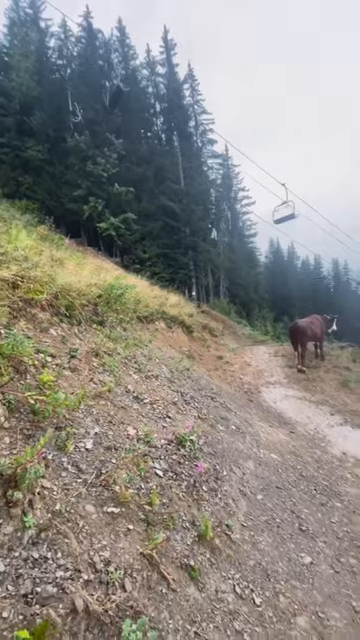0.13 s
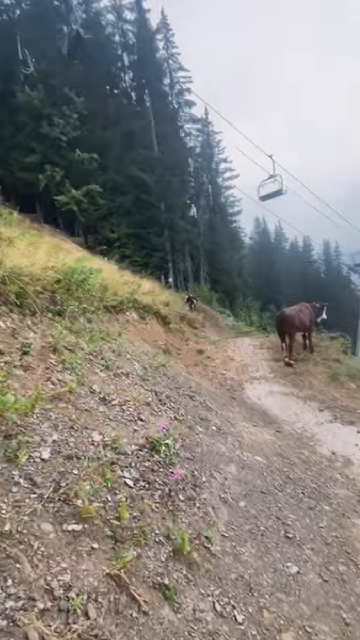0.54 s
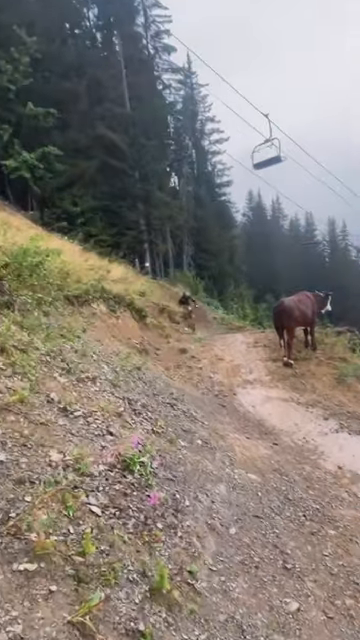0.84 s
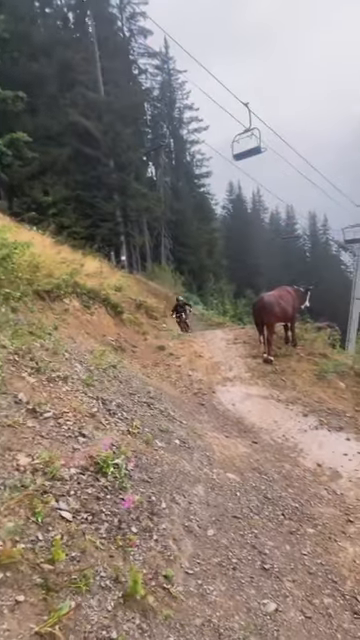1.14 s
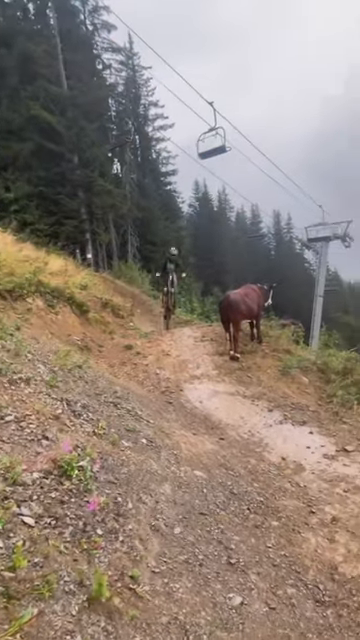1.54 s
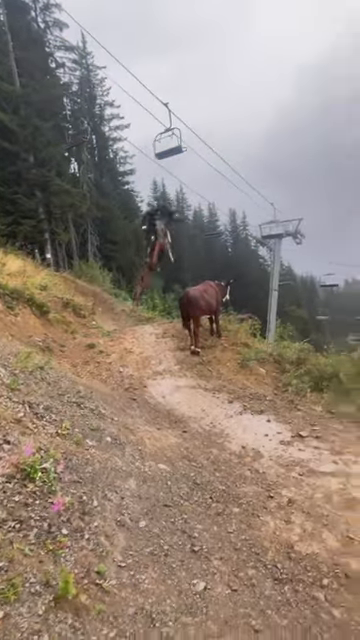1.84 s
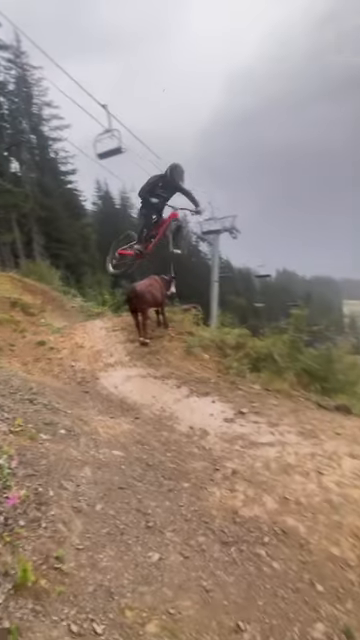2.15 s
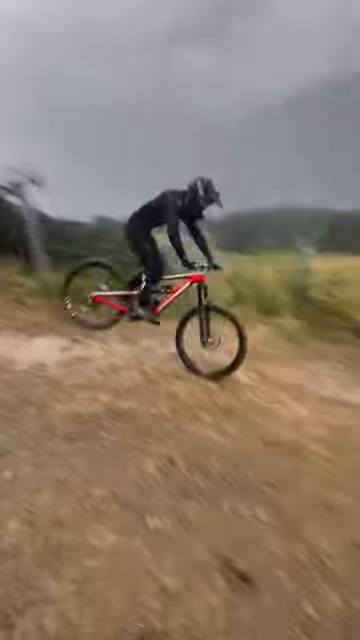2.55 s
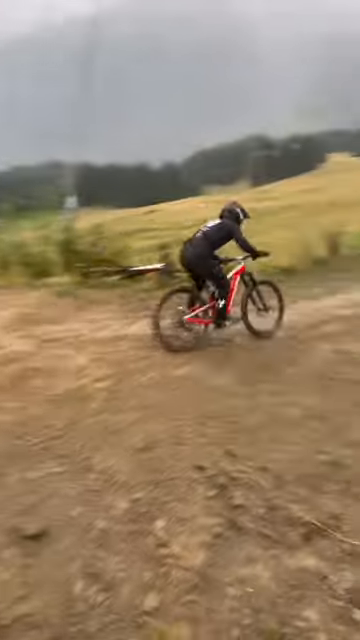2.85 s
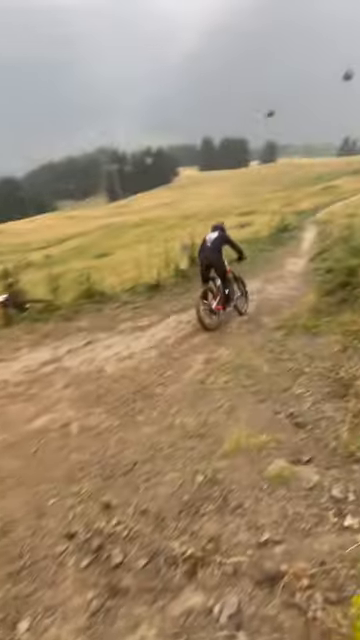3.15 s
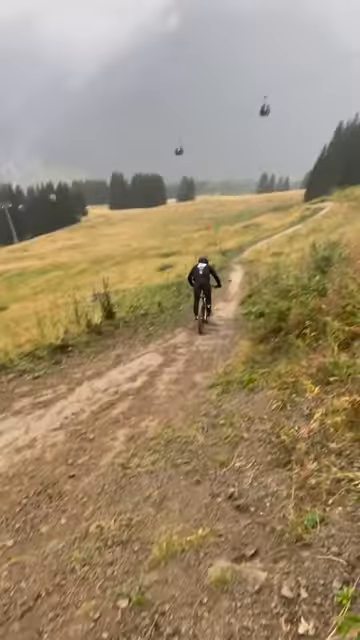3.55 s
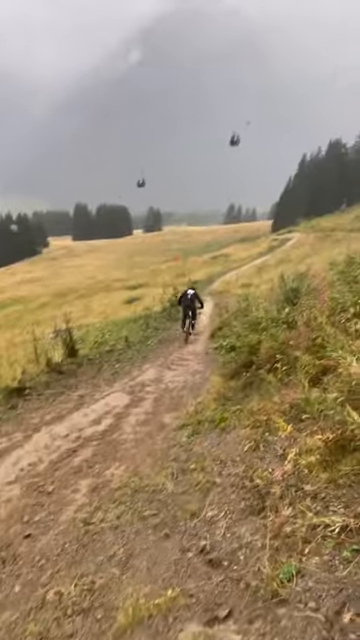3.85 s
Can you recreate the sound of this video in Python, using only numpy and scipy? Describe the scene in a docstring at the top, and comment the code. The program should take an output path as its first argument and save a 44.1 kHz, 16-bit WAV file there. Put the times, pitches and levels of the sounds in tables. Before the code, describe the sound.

On an outdoor dirt trail, a mountain bike approaches quietly, jumps and lands nearby with a loud crack and thump. Its tyres crunch off over gravel, the freewheel buzzing and the bike rattling, as gusts hit the microphone.

```python
"""A dirt trail by a chairlift: a mountain bike rolls down, jumps, lands hard and leaves over stones.
Its tyres rumble and hiss, its pawls ring the hub, and impacts excite the resonances of its frame.
The lift hums, a cow's bell tinkles faintly, and wind buffets a phone's two microphone ports.
Two-row signals hold what the ports share, then what differs between them."""
import sys
import numpy as np
from scipy import signal
from scipy.fft import rfft, irfft, next_fast_len
from scipy.io import wavfile
from scipy.ndimage import uniform_filter1d, map_coordinates

SR = 44100
rng = np.random.default_rng(int(sys.argv[2]) if len(sys.argv) > 2 else 0)


def dump(signal):
    """Clip the signal to [-1, 1] and save it as 16-bit WAV at the path in sys.argv[1]."""
    limited = np.clip(np.atleast_2d(signal).T, -1, 1)
    pcm = np.round(limited * 32767).astype(np.int16)
    wavfile.write(sys.argv[1], SR, pcm)


N = 176400
PASS_S = 2.5  # the bike passes and the phone swings after it

# Spectrum of cracks and crunches. Each row: frequency in Hz, gain in dB.
CRACK_SPECTRUM = [(300, 10), (1500, -3), (3000, -2), (5000, 0), (7500, -11.5), (10300, -16)]


def amp(db):
    return 10 ** (np.asarray(db) / 20)


def unit(x):
    return x / np.sqrt(np.mean(x ** 2) + 1e-20)


def along(points, hz):
    """Interpolate (Hz, value) points on a log frequency axis."""
    f, v = np.transpose(points)
    return np.interp(np.log(hz + 1), np.log(f + 1), v)


def curves(rows):
    """One value per sample for each column after the time."""
    times, *columns = np.transpose(rows)
    return [np.interp(np.arange(N) / SR, times, c) for c in columns]


def wobble(rate):
    """A smooth random curve with rate knots a second."""
    return map_coordinates(rng.standard_normal(int(N * rate / SR) + 4), [np.arange(N) * rate / SR])


def filtered(x, response):
    """Multiply the spectrum of x by a frequency response."""
    size = next_fast_len(N + SR // 2)
    return irfft(rfft(x, size) * response(np.fft.rfftfreq(size, 1 / SR)), size)[..., :N]


def colour(points):
    return lambda hz: amp(along(points, hz))


def resonances(modes):
    """Superposed damped modes of alternating sign."""
    return lambda f: sum((-1) ** k * amp(db) * 1j * f * width / (hz * hz - f * f + 1j * f * width)
                         for k, (hz, width, db) in enumerate(modes))


def patchy(depth_db):
    """Two independent noises sharing patches of random gain in time and frequency."""
    spectra = signal.stft(rng.standard_normal((2, N)), nperseg=512)[2]
    patches = uniform_filter1d(uniform_filter1d(rng.standard_normal(spectra.shape[1:]), 5, 0), 8, 1)
    return signal.istft(spectra * amp(depth_db * unit(patches)), nperseg=512)[1][:, :N]


def damped_sine(t, hz, db, t60, rise_s):
    """Free vibration of one mode, with a soft onset."""
    return amp(db - 60 * t / t60) * np.sin(2 * np.pi * hz * t) * (1 - np.exp(-t / rise_s))


def add(out, start, x):
    i = round(start * SR)
    out[..., i:i + x.shape[-1]] += x[..., :N - i]


def landing():
    """Impact excitation: each blow cracks, rings the frame and thumps the tyre; bumps rattle the frame."""
    # Each row: start in seconds, crack, knock and thump levels in dB, decay scale in seconds.
    blows = [(2.421, -15.5, -29, -22, 0.046), (2.4815, -37.5, -29.5, -41.5, 0.02),
             (2.512, -6, -13.5, -14, 0.082), (2.5682, -5, -28, -21.5, 0.041),
             (2.6595, -33.5, -55, -35, 0.033), (2.6833, -47, -32.5, -33, 0.091)]
    # Each row: start in seconds, level in dB.
    rattles = [(2.813, -28.5), (2.88, -42.5), (2.937, -29.5), (2.982, -37), (3.009, -31.5), (3.073, -31.5),
               (3.084, -26), (3.115, -30), (3.225, -34.5), (3.261, -29.5), (3.43, -37), (3.623, -32.5),
               (3.652, -40.5), (3.672, -34.5), (3.726, -31.5), (3.768, -28.5), (3.812, -35.5),
               (3.844, -31.5), (3.949, -32)]
    # Each row: frequency in Hz, bandwidth in Hz, gain in dB.
    frame_modes = [(340.8, 47.5, 3.5), (521.4, 66.5, 5.5), (660.4, 121, 7), (1095.7, 130.5, 1.5),
                   (1453, 133, -1), (1672, 145, 1.5), (1968, 172, -0.5), (2508, 124, 0), (3142, 76, -10.5)]
    crack, knock, thump = np.zeros((2, N)), np.zeros((2, N)), np.zeros(N)
    t = np.arange(SR // 3) / SR
    for start, crack_db, knock_db, thump_db, decay in blows:
        noise = rng.standard_normal((4, len(t))) * (1 - np.exp(-t / 0.00022))
        crack_fade = amp(-60 * t / (decay * 1.71)) + 0.49 * amp(-60 * t / 0.016)
        knock_fade = amp(-60 * np.maximum(t - .007, 0) / (decay * 0.52))
        add(crack, start, noise[:2] * amp(crack_db - 13) * crack_fade)
        add(knock, start, noise[2:] * amp(knock_db + 10.5) * knock_fade)
        add(thump, start, damped_sine(t, hz=61.75, db=thump_db + 2, t60=0.19, rise_s=0.0063))
    for start, db in rattles:
        add(knock, start, rng.standard_normal((2, len(t))) * amp(db + 6 - 60 * t / 0.0335))
    broad_mode = resonances([(1500, 2200, 0)])
    frame = filtered(knock, lambda f: resonances(frame_modes)(f) + 0.136 * broad_mode(f))
    return filtered(crack, colour(CRACK_SPECTRUM)) + frame * [[1], [.45]] + thump * [[1], [.3]]


def tyres():
    """Rolling noise: bumps modulate the rumble of knobbly tyres, the tread's roar and the grit's hiss."""
    # Each row: time in seconds, rumble, grit and roar levels in dB.
    approach = [(0.04, -63, -58, -52), (0.142, -67, -59.5, -58.5), (0.28, -61, -61.5, -59.5),
                (0.522, -58.5, -63, -62.5), (0.786, -52.5, -62, -59.5), (0.996, -49.5, -57.5, -56),
                (1.178, -49, -57, -50), (1.296, -44, -56, -49), (1.384, -48.5, -55.5, -53.5),
                (1.46, -49, -56, -53.5)]
    flight = [(1.5, -54, -56, -67), (1.72, -62, -56, -56.5), (1.77, -60, -55.5, -54),
              (1.82, -61.5, -55, -61.5), (1.946, -61, -60, -58), (2.232, -56.5, -59.5, -58.5),
              (2.41, -57, -61.5, -50.5)]
    away = [(2.43, -35.5, -53, -45), (2.478, -38.5, -48, -43), (2.542, -34, -47, -34.5),
            (2.596, -27.5, -36, -33.5), (2.656, -33.5, -41.5, -43), (2.788, -42, -42, -47.5),
            (3.002, -43.5, -48, -47.5), (3.182, -40.5, -47, -51.5), (3.392, -46, -48, -52.5),
            (3.672, -42.5, -53, -52), (3.828, -45.5, -53, -55.5), (3.93, -53, -57, -52),
            (4.0, -49, -69.5, -58)]
    # Spectra. Each row: frequency in Hz, gain in dB.
    rumble_coming = [(65, -18.5), (110, -6), (134, -10), (204, 0), (242, -6.5), (296, -4), (347, -14),
                     (384, -10), (483, -5), (781, -15), (1200, -25), (1560, -57), (2640, -120)]
    rumble_going = [(76, -41.5), (130, -1.5), (172, -7.5), (209, 4), (242, -8), (281, -7.5), (368, -16),
                    (609, -3.5), (662, -5.5), (891, -12.5), (1200, -17), (1560, -59), (2640, -120)]
    tread_spectrum = [(500, -25.5), (900, -3.5), (1500, 0), (2400, -5), (2800, -31)]
    grit_spectrum = [(500, 0.5), (1000, -4), (2400, 1.5), (2800, 2), (3700, 2.5), (4350, -0.5), (5000, 1),
                     (6000, -1), (7000, 0), (9400, -5)]
    rumble_db, grit_db, roar_db = curves([*approach, *flight, *away])
    passed = np.arange(N) / SR > PASS_S
    bumps_db = 0.95 * wobble(24.908)
    coming = unit(filtered(patchy(1.95), colour(rumble_coming))) * amp([[0], [-1]])
    going = unit(filtered(patchy(1.95), colour(rumble_going))) * amp([[0], [-8]])
    rumble = np.where(passed, going, coming) * amp(rumble_db + 2 + bumps_db)
    roar = unit(filtered(patchy(4.01), colour(tread_spectrum))) * amp(roar_db + 0.311 * bumps_db)
    roar[1] *= amp(-19 * passed)  # more central once the phone has swung
    grains = amp(3.48 * rng.standard_normal(N) + 0.62 * wobble(120))
    grit = unit(filtered(patchy(2.28) * grains, colour(grit_spectrum)))
    return rumble + roar + grit * amp(grit_db + 4 + 0.706 * bumps_db)


def freewheel():
    """Forced resonance: pawl clicks, dense as noise, ring the hub; Doppler shift lowers the pitch."""
    # Each row: time in seconds, level in dB.
    whirr_levels = [(.04, -72.5), (1.0, -77.5), (1.46, -58), (1.487, -48.5), (1.515, -63), (1.54, -48),
                    (1.65, -54), (1.74, -47), (1.775, -75.5), (1.81, -59.5), (1.92, -47.5), (1.95, -54.5),
                    (1.98, -75.5), (2.4, -80.5), (2.58, -39.5), (2.75, -42), (3.0, -47.5), (3.2, -53.5),
                    (3.35, -48.5), (3.65, -56), (4.0, -52)]
    # Each row: frequency in Hz, bandwidth in Hz, gain in dB.
    hub_modes = [(1608, 100, -15.5), (1913.5, 103.5, -1.5), (2071.6, 104, -5.5), (2453, 113, -5.5),
                 (3245, 92, -15.5), (3811.4, 54, -12), (5020, 55, -13), (5414, 70, -18.5), (5929, 98, -12),
                 (6483, 70, -17)]
    take_off_s, pass_width_s, bright_db_per_octave = 1.5, 0.4, 3.5
    whirr_db, = curves(whirr_levels)
    t = np.arange(N) / SR
    ring = np.zeros((2, N))
    for hz, width, db in hub_modes:
        mode = unit(filtered(rng.standard_normal((2, N)), lambda f: resonances([(hz, width, 0)])(f) ** 2))
        tilt_db = bright_db_per_octave * np.log2(hz / 2000) * (t > PASS_S)
        ring += mode * amp(db + tilt_db + 3.33 * wobble(18) + 2.01 * wobble(80))
    sag = .04 * (t - take_off_s - .25) * (t > take_off_s) * (t < PASS_S)  # the wheel spins free
    doppler = 0.027 * np.tanh((t - PASS_S) / pass_width_s)
    position = np.cumsum(1 + .02 * wobble(11) - sag - doppler)
    return unit(np.array([map_coordinates(r, [position], mode="mirror") for r in ring])) * amp(whirr_db)


def stones():
    """Contact noise: single stones tick, and loose ones crunch under a wheel."""
    # Each row: start in seconds, level in dB, the low knock's offset and its port difference in dB.
    ticks = [(0.2096, -49.5, -1.5, 1), (0.3466, -46, -14, 17), (0.8232, -53, 4, 6.5),
             (0.9339, -45.5, -7, 4.5), (1.0953, -55, 8.5, -2), (1.1946, -52.5, 0, 5),
             (1.2245, -60.5, 11.5, 0), (1.3599, -51, -4, 13.5), (1.4495, -52, -14.5, 0.5),
             (1.496, -52.5, -1, 13.5), (1.54, -46, -6.5, 12.5), (1.9037, -31, -21, 13.5),
             (2.1216, -46.5, -9.5, 10.5), (2.2294, -52, 2.5, 5), (3.9662, -23, -11.5, -8)]
    # Each row: start in seconds, level in dB, length in seconds.
    crunches = [(2.5349, -18.5, 0.0199), (2.824, -40.5, 0.0092), (2.915, -48, 0.015), (2.979, -29, 0.013),
                (3.0139, -37, 0.037), (3.071, -28, 0.012), (3.1075, -33, 0.012), (3.221, -31, 0.029),
                (3.25, -27, 0.013), (3.317, -31.5, 0.03), (3.3592, -24.5, 0.0142), (3.426, -26.5, 0.0206),
                (3.4675, -30, 0.0215), (3.521, -30.5, 0.0193), (3.5527, -30.5, 0.017),
                (3.618, -24.5, 0.00277), (3.65, -27, 0.0151), (3.673, -34, 0.0114), (3.7111, -29, 0.0344),
                (3.7628, -27, 0.0126), (3.8022, -31.5, 0.0146), (3.856, -26.5, 0.0236),
                (3.9442, -29.5, 0.0165), (3.9628, -27.5, 0.00794)]
    high, low, crunch = np.zeros((3, 2, N))
    t = np.arange(2048) / SR
    for start, db, low_db, side_db in ticks:
        noise = rng.standard_normal((4, len(t))) * amp(db) * amp([[0], [-1.5], [0], [side_db]])
        add(high, start, noise[:2] * amp(5 - 60 * t / 0.0165))
        add(low, start, noise[2:] * amp(low_db + 16.5 - 60 * t / 0.0322))
    for start, db, length in crunches:
        age = t / max(length, .003) * 3
        noise = rng.standard_normal((3, len(t)))
        grains = amp(db - 1.5 + 6.77 * noise[2])
        add(crunch, start - .002, noise[:2] * grains * age * np.exp(-age))
    return (filtered(high, resonances([(4520, 1880, 0.0012)]))
            + filtered(low, lambda f: resonances([(1300, 2200, 0)])(f) ** 2)
            + filtered(crunch, colour(CRACK_SPECTRUM)) * [[1], [.7]])


def snaps():
    """Brief transients have broad spectra: bright snaps, perhaps the chain slapping."""
    # Each row: start in seconds, level in dB.
    bursts = [(0.859, -37.5), (2.4984, -30.5), (2.5691, -10.5), (2.5844, -20), (2.742, -33.5),
              (3.653, -33.5), (3.71, -45)]
    # Each row: frequency in Hz, gain in dB.
    spectrum = [(900, -25), (1900, -0.5), (5000, -8), (10300, -8.5)]
    out, rise_s = np.zeros(N), 0.000698
    age = np.arange(1024) / SR / rise_s
    for start, db in bursts:
        add(out, start, rng.standard_normal(len(age)) * amp(db) * age * np.exp(1 - age))
    return filtered(out, colour(spectrum))


def thuds():
    """Damped low modes sound as soft hollow thuds."""
    # Each row: start in seconds, frequency in Hz, level in dB.
    hits = [(0.041, 230.8, -40.5), (0.135, 192.8, -33.5), (0.21, 220.6, -45.5), (2.441, 231, -39.5),
            (2.528, 225.4, -20.5), (2.53, 99.4, -15), (2.545, 147.5, -23), (3.656, 193, -34),
            (3.919, 97.8, -21.5), (3.951, 104.9, -19), (3.988, 87.2, -11.5)]
    out, t = np.zeros(N), np.arange(SR // 5) / SR
    for start, hz, db in hits:
        add(out, start, damped_sine(t, hz, db, t60=0.216, rise_s=0.00617))
    return out * [[1], [.6]]


def wind():
    """Turbulent pressure buffets the ports; its lowest frequencies press both alike."""
    # Each row: time in seconds, level in dB, port difference in dB.
    gusts = [(0.04, -43, -18), (0.46, -65.5, -1.5), (0.52, -59, -18.5), (0.94, -59, 4.5), (1.09, -54.5, -3),
             (1.85, -61, 0.5), (1.93, -49.5, -5), (2.18, -63, 3.5), (2.23, -42, -4.5), (2.31, -37.5, -8.5),
             (2.34, -48, 1.5), (2.41, -76.5, -9), (2.43, -24.5, -13), (2.5, -45.5, -7.5), (2.53, -35, -7),
             (2.58, -30.5, -7.5), (2.61, -28.5, -12.5), (2.68, -34, 1.5), (2.71, -25, 5.5),
             (2.84, -31.5, -7.5), (2.87, -46, 13.5), (3.0, -43, 15.5), (3.06, -66.5, 36),
             (3.19, -40.5, 8.5), (3.59, -44, 11.5), (3.63, -37.5, 1), (3.68, -28, -3), (3.7, -39.5, 12),
             (3.77, -37, 9), (3.86, -38.5, 14.5), (3.92, -34, 9), (4.0, -22, -3.5)]
    # Each row: frequency in Hz, gain in dB.
    spectrum = [(22, -32), (40, -3), (60, 0.5), (100, -9), (140, -15.5), (300, -28), (600, -58)]
    alike_below_hz = 89
    db, side_db = curves(gusts)
    pressure = filtered(patchy(1.26), lambda f: colour(spectrum)(f)
                        * [np.ones_like(f), 2.45 * f ** 2 / (f ** 2 + alike_below_hz ** 2)])
    return unit(pressure * amp(2.37 * wobble(12))) * amp([db, db + side_db]) * amp(1.75)


def chairlift():
    """Machine vibration: the drive hums one low tone of unsteady pitch and level."""
    # Each row: time in seconds, frequency in Hz, level in dB.
    hum = [(0.04, 77.21, -58.5), (0.97, 81.5, -51), (1.06, 77.42, -42.5), (1.6, 79.48, -51),
           (2.12, 77.9, -41), (2.28, 72.0, -45), (2.4, 72.52, -47)]
    hz, db = curves(hum)
    return amp(db - 1.5 + 1.2 * wobble(7.1)) * np.sin(2 * np.pi * np.cumsum(hz) / SR) * [[1], [.3]]


def bell_and_pings():
    """Struck metal rings in decaying modes: a far cow's bell and a few short pings."""
    # Each row: start in seconds, levels of the low and high modes in dB.
    bell_hits = [(.04, -61, -61), (0.401, -52.5, -58.5), (1.08, -78.5, -62)]
    # Each row: frequency in Hz, 60 dB decay time in seconds.
    bell_modes = [(1000, 0.33), (4670, 1.3)]
    # Each row: start in seconds, frequency in Hz, level in dB, 60 dB decay time in seconds.
    pings = [(.305, 2400, -48, .06), (.458, 2650, -50, .06), (3.27, 911, -45, .35), (3.485, 911, -39, .7),
             (2.725, 3690, -43, .35)]
    out, t = np.zeros(N), np.arange(SR // 2) / SR
    for start, *levels in bell_hits:
        for (hz, t60), db in zip(bell_modes, levels):
            add(out, start, damped_sine(t, hz, db, t60, rise_s=0.00077))
    for start, hz, db, t60 in pings:
        add(out, start, damped_sine(t, hz, db, t60, rise_s=0.00077))
    return out * [[1], [1.5]]


def scene():
    """Superposition: the sources add as mid and side, weighted by frequency, to give left and right."""
    # Each row: frequency in Hz, difference over sum of the ports in dB.
    port_balance = [(60, -8), (200, -10.5), (600, -3), (1500, -13.5), (2600, -0.5), (5200, -5), (6700, 0.5),
                    (7200, 27), (8000, 40.5), (8500, 2.5), (10300, -0.5)]
    impacts = landing()
    pair = tyres() + freewheel() + impacts + thuds() + stones() + bell_and_pings() + chairlift() + wind()
    angle = lambda hz: np.arctan(colour(port_balance)(hz))
    mid, side = filtered(pair, lambda hz: np.array([np.cos(angle(hz)), np.sin(angle(hz))]))
    mid += amp(-17.5) * impacts[0] + snaps()  # these reach both ports together
    return np.array([mid + side, mid - side]) * amp([[-.3], [.3]])


def record(dry):
    """Band limiting: the phone opens a moment late and cuts the deepest bass and top treble."""
    # Each row: frequency in Hz, gain in dB.
    treble_rolloff = [(9300, -1), (9700, -6.5), (10000, -17), (10300, -30)]
    open_s, low_hz, top_hz = 0.0375, 25, 10300
    gate = np.clip((np.arange(N) / SR - open_s) / 0.00071, 0, 1)
    return filtered(dry * gate, lambda hz: (hz < top_hz) * colour(treble_rolloff)(hz)
                    * hz ** 2 / (hz ** 2 + low_hz ** 2))


dry = scene()
out = record(dry)
dump(out)
```